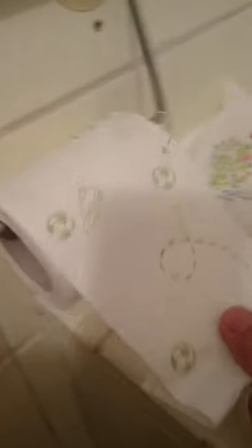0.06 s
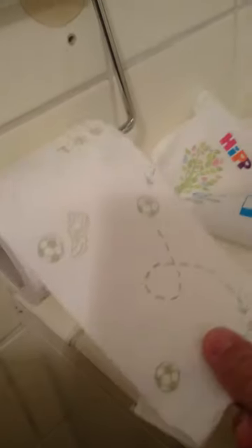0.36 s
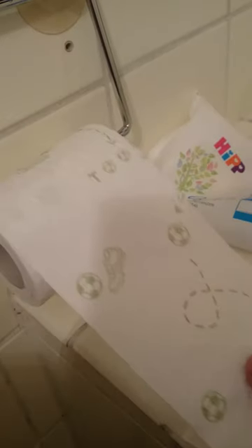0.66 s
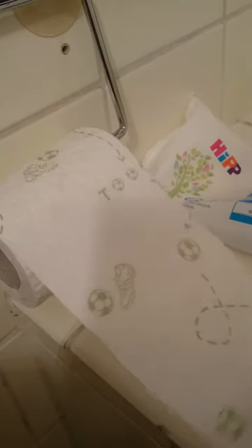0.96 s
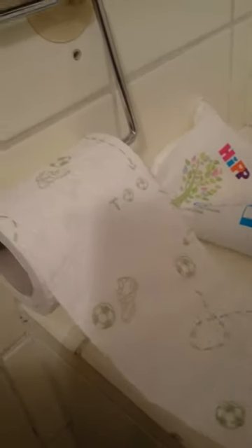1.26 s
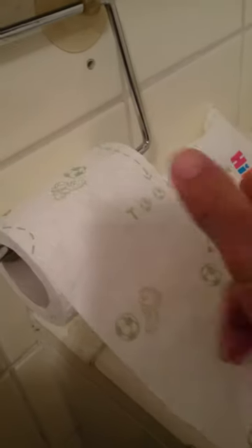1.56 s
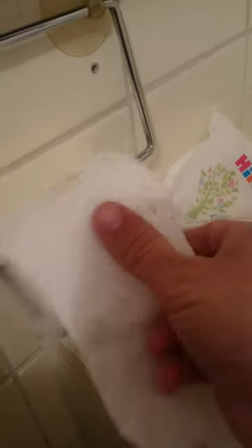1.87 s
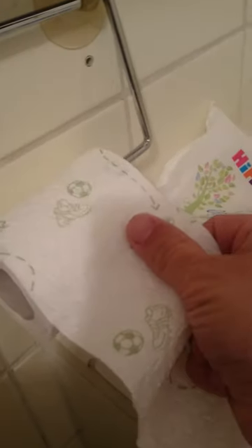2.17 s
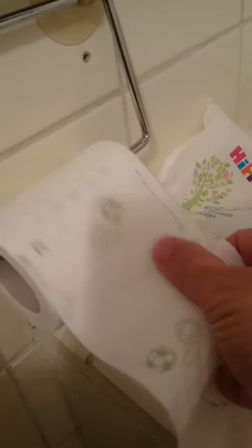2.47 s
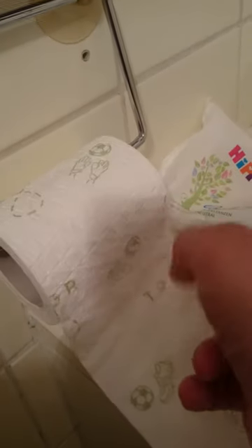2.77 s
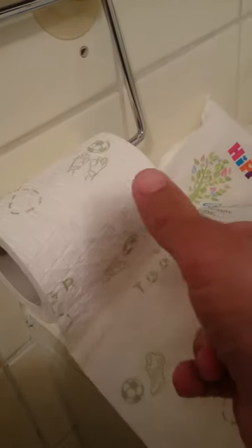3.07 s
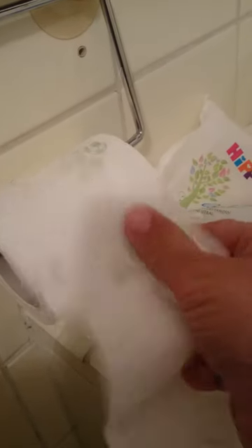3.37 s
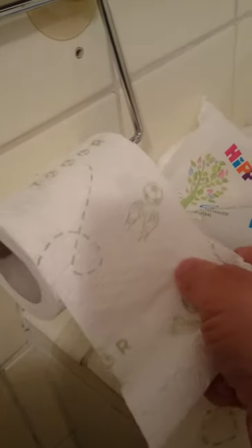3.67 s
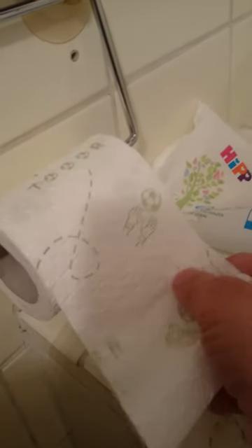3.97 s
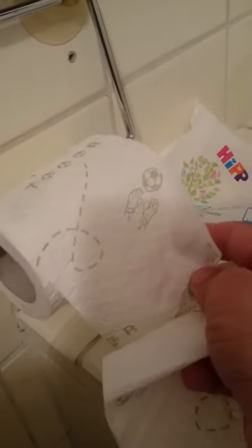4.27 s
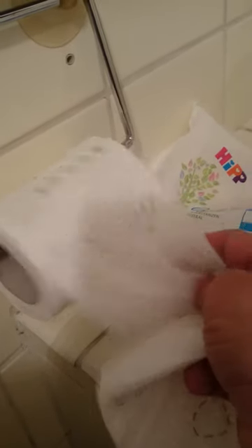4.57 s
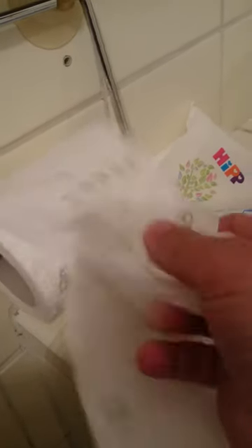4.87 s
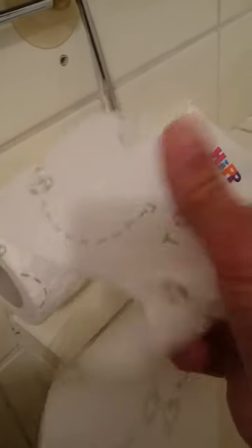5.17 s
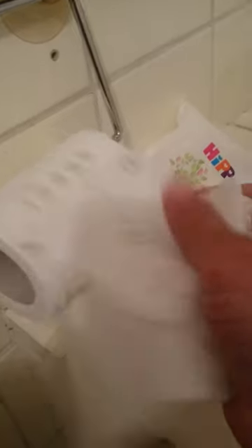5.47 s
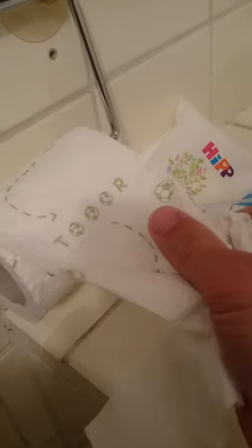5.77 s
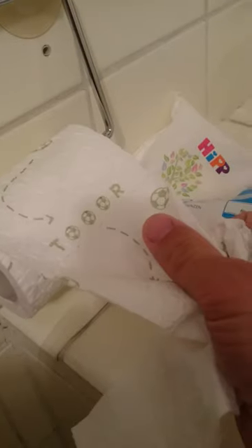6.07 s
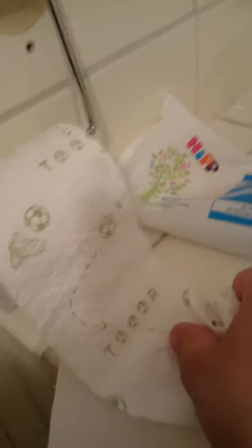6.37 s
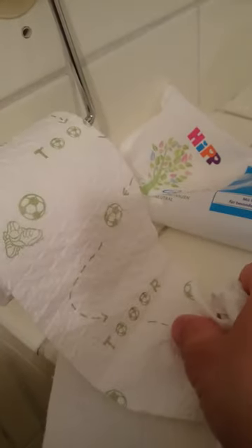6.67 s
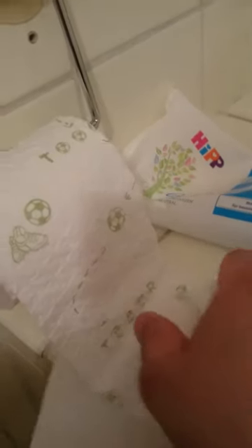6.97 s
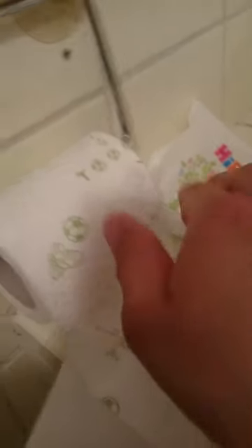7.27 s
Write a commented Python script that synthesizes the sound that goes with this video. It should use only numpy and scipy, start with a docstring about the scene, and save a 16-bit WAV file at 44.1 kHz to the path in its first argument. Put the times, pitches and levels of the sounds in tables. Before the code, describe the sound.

Close up in a small tiled bathroom, dull handling bumps and a low rumble sound on the right while toilet paper stirs faintly on the left. The paper is then tugged from its roll in brief, dry swishes with little crinkles, growing into a louder, uneven run of unrolling. It eases off into a few gentle pulls and last soft bumps, with a light room echo and faint hiss underneath.

```python
"""Toilet paper is pulled off a wall roll and gathered in one hand, close to a phone in a tiled bathroom.
It opens on a faint rustle in the open left microphone port, which rings near 5 kHz, and on soft thumps
and grip tremor on the right, where a finger covers the port and hardly any paper is heard.
At 1.6 s the finger presses hard and the skin ticks. Short hissing, crinkling tugs follow and build to
a long unrolling from 4.6 to 5.7 s; a few light pulls and last thumps close the scene."""
import sys
import numpy as np
from scipy import signal
from scipy.fft import rfft, irfft, next_fast_len
from scipy.io import wavfile

SR = 44100
rng = np.random.default_rng(int(sys.argv[2]) if len(sys.argv) > 2 else 0)


def master(y):
    """Save y as 16-bit WAV."""
    cut = np.clip(np.atleast_2d(y).T, -1, 1)
    pcm = np.round(cut * 32767)  # scale
    wavfile.write(sys.argv[1], SR, pcm.astype(np.int16))


N = 323469

# Shifts of the finger on the covered port. Each row: time in seconds, relative pressure step in dB,
# half rise time in milliseconds, direction (+1 press, -1 release).
FINGER_SHIFTS = [(0.0138, -20, 0.32, -1), (0.0267, -3.5, 3.5, -1), (0.071, -22.5, 1.34, -1),
                 (0.6125, -21, 1.33, 1), (0.8413, -21, 2.56, 1), (1.328, -31.5, 1.07, -1),
                 (1.6027, -3.3, 1.03, 1), (1.6079, -1.5, 2.6, -1), (1.653, -9.5, 4, 1),
                 (1.999, -11, 4.9, 1), (2.6923, -23.5, 1.7, -1), (2.747, -11, 4.2, 1),
                 (2.8134, -12, 0.47, -1), (3.9614, -15.5, 0.43, -1), (3.994, -10, 2.8, 1),
                 (4.146, -25, 0.9, 1), (4.1548, -13.5, 2.1, -1), (4.2044, -18, 1.58, 1),
                 (5.077, -13, 0.23, -1), (5.5498, -10.5, 0.2, -1), (6.0309, -19, 0.77, -1),
                 (6.309, -12.5, 3.8, 1), (6.36, -21.5, 0.98, -1), (6.696, -26, 2, -1)]


def paper():
    """Sliding plies: the fibres hiss, the sheet radiates their slips lower down, the loose end flutters."""
    # The tone of the three layers. Each row: frequency in Hz, relative level in dB.
    fibre_spectrum = [(1500, -27), (3000, -11), (4200, -2), (5500, -3), (7500, -9.5), (10000, -9),
                      (13000, -9), (16000, -7.5)]
    sheet_spectrum = [(900, -19), (1400, -11), (2000, -1.5), (2800, -2.5), (4000, -4.5), (7000, -19)]
    flutter_spectrum = [(40, -3), (90, -2), (180, 3), (280, -5), (450, -1.5), (700, 1.5), (1100, -0.5),
                        (1800, -9), (4000, -36)]
    swish_db, sheet_db, flutter_db = tug_levels()
    patches = undb(1.52 * walk(45) + 0.69 * walk(260))  # the embossing catches in patches
    rate = 9000 * undb(.3 * (swish_db + 45.5))  # faster sliding breaks more contacts a second
    fibres = unit(port(colour(slips(rate, spread_db=0) * patches, fibre_spectrum)))
    brightness = undb(np.clip(0.1 * (swish_db + 37.5), -7, 2))  # a harder pull is brighter
    fibres = cut(fibres, 2, 8500, "low") - cut(fibres, 2, 8500, "high") * brightness
    sheet = unit(colour(slips(rate, spread_db=1.5) * patches, sheet_spectrum)) * undb(sheet_db + 1.5)
    flutter = unit(colour(slips(rate, spread_db=2) * patches, flutter_spectrum))
    flutter *= undb(flutter_db + 2.17)
    return undb(swish_db - 0.47) * (fibres + sheet + flutter)


def tug_levels():
    """Tugs speed up, hold, run out and settle: the swish in dB, then sheet and flutter relative to it."""
    # Each row: time at full speed in seconds, length in seconds, swish level in dB, swell over the
    # length in dB, body of the sheet and flutter of the loose end, both in dB relative to the swish.
    tugs = [(0.0, .035, -61.5, -3, -10, -16), (0.07, 0.63, -72, -5, -8, -16),
            (0.963, .07, -69, -3, -1, -32), (1.806, 0.046, -58.5, -3.5, -6.5, -15),
            (1.867, 0.1, -48.5, 2.5, -11, -13), (2.505, 0.07, -55.5, 0.5, -8.5, -17),
            (2.603, 0.064, -49, 4, -4.5, -21), (3.299, 0.013, -54, 0.5, -5, -9),
            (3.36, 0.026, -46, -0.5, -7.5, -12.5), (3.413, .08, -56.5, 1.5, -8, -10),
            (3.51, 0.097, -52, -1, -7, -17), (3.988, 0.044, -54, 5, -10, -18),
            (4.048, 0.084, -51.5, 0, -9, -18), (4.166, 0.11, -56.5, -6, -9.5, -15.5),
            (4.581, 0.088, -45, -1, -9, -18.5), (4.672, 0.016, -41, 0.5, -7.5, -20.5),
            (4.711, 0.094, -49.5, -3, -8.5, -13), (4.835, 0.18, -41.5, -0.5, -9.5, -17.5),
            (5.013, 0.052, -38, -0.5, -6, -16.5), (5.082, 0.14, -46, -1, -6, -20),
            (5.226, 0.031, -37.5, 2, -8.5, -19.5), (5.287, 0.083, -41, -7.5, -10.5, -13),
            (5.388, 0.085, -36.5, 5, -8.5, -17), (5.52, 0.099, -44, -1, -8.5, -15.5),
            (6.188, .012, -49, 0, -8.5, -22), (6.235, 0.057, -53.5, 1.5, -10.5, -13),
            (6.318, 0.027, -56, 0, -4.5, -13.5), (6.774, .08, -53, 3.5, -6, -31),
            (6.89, 0.31, -57.5, -8.5, -10, -23)]
    creep_db, creep_s = -10, .035  # the slack sheet creeps before a tug takes hold
    attack_s, release_s = 0.021, 0.035
    settle_db, settle_s = -22.5, 0.16  # the loose sheets rustle on afterwards
    resting_db = [-76.5, -81.5, -84]  # the paper stirs in the resting hand: swish, sheet, flutter
    t = np.arange(N) / SR
    power = undb(resting_db)[:, None] ** 2 * np.ones(N)
    for start, length, db, swell_db, sheet_db, flutter_db in tugs:
        before, after = np.maximum(start - t, 0), np.maximum(t - start - length, 0)
        attack = np.maximum(np.exp(-before / attack_s), undb(creep_db) * np.exp(-before / creep_s))
        hold = undb(db + swell_db * (np.clip((t - start) / length, 0, 1) - .5))
        release = np.maximum(np.exp(-after / release_s), undb(settle_db) * np.exp(-after / settle_s))
        power += np.outer(undb([0, sheet_db, flutter_db]), attack * hold * release) ** 2
    swish, sheet, flutter = 10 * np.log10(power)
    return swish, sheet - swish, flutter - swish


def slips(rate, spread_db):
    """Fibres catch and let go: dense tiny clicks of uneven size, equally strong overall at any rate."""
    size = undb(spread_db * np.minimum(rng.exponential(size=N), 5))
    clicks = (rng.random(N) < rate / SR) * size * rng.standard_normal(N)
    return clicks / np.sqrt(np.minimum(rate, SR))


def creases(decay_s, gain_db):
    """Creases buckle, each in a burst of a few milliseconds."""
    # Each row: time in seconds, relative peak level in dB.
    snaps = [(1.8617, -44), (1.9257, -36), (2.666, -46), (3.3604, -38), (3.3672, -33.5), (5.2444, -33),
             (5.6094, -44.5), (5.6186, -43), (6.1898, -39.5)]
    spectrum = [(200, -2), (700, 0), (2500, -0.5), (5000, 0.5), (8000, -11.5), (16000, -24)]
    t = np.arange(N // 200) / SR
    bursts = np.zeros(N + len(t))
    for start, db in snaps:
        i = int(start * SR)
        bursts[i:i + len(t)] += undb(db + gain_db) * rng.standard_normal(len(t)) * np.exp(-t / decay_s)
    return port(colour(bursts[:N], spectrum))


def port(x):
    """The small cavity in front of the open microphone rings."""
    # Each row: frequency in Hz, width in Hz, gain in dB.
    resonances = [(5285, 890, 13.5), (15300, 2000, 7)]
    return x + sum(undb(db) * resonate(x, hz, width) for hz, width, db in resonances)


def finger_thumps(low_cut_hz, gain_db):
    """Each shift steps the trapped air's pressure; the microphone's low cut rings it into a thump."""
    t = np.arange(N) / SR
    pressure = sum(direction * undb(db + gain_db) * np.tanh((t - at) / (half_rise_ms / 1000)) / 2
                   for at, db, half_rise_ms, direction in FINGER_SHIFTS)
    return cut(pressure - pressure[0], 6, low_cut_hz, "high")


def grip_tremor(gain_db):
    """The holding hand trembles: a slowly growing rumble, stronger for a moment after each shift."""
    # Each row: frequency in Hz, relative level in dB.
    tremor_spectrum = [(20, -19), (35, -16.5), (50, 1.5), (70, 0), (95, -8), (130, -18.5), (200, -29),
                       (300, -35.5), (500, -43), (1200, -58)]
    growth_db_per_s, calming_s = 0.72, 0.38
    t = np.arange(N) / SR
    resting = undb(-54.5 + growth_db_per_s * t)
    unrest_power = sum((undb(-43 + 0.94 * db) * (t > at) * np.exp(-np.abs(t - at) / calming_s)) ** 2
                       for at, db, _, _ in FINGER_SHIFTS)
    return noise(tremor_spectrum) * np.sqrt(resting ** 2 + unrest_power) * undb(gain_db)


def skin_tick(at_s, gain_db, decay_s):
    """With the firmest press the skin ticks against the rim of the port."""
    age = np.arange(N) / SR - at_s
    tick = (age >= 0) * np.exp(-np.abs(age) / decay_s)
    ring = tick + 4.0 * resonate(tick, 9000, 1300) + 0.58 * resonate(tick, 3600, 300)
    return undb(gain_db) * cut(ring, 4, 11000, "low")


def faint_right_treble(x):
    """A faint, diffuse high sizzle follows the rustling, held back during the long unrolling."""
    # Each row: time in seconds, relative level in dB.
    treble_levels = [(4.25, 0), (4.6, -6), (5.0, -10), (5.7, -11), (6.1, 3)]
    spectrum = [(300, 2), (1500, -9), (3000, -9), (5300, -19), (8500, 16), (12000, 20), (15500, 5)]
    diffuse = reverb(x, t60_s=0.048, treble_t60_s=0.024, wet_db=-17)
    return fader(treble_levels) * colour(diffuse, spectrum)


def reverb(x, t60_s, treble_t60_s, wet_db):
    """A diffuse tail keeps the sound for a moment; the top dies first."""
    t = np.arange(SR) / SR
    low = cut(rng.standard_normal(SR), 4, 7000, "low") * undb(-60 * t / t60_s)
    high = cut(rng.standard_normal(SR), 4, 7000, "high") * undb(-60 * t / treble_t60_s)
    tail = (low + 0.68 * high) * (t > .004)
    return undb(wet_db) * signal.fftconvolve(x, tail / np.sqrt(np.sum(tail ** 2)))[:N]


def background_hiss(gain_db):
    """A soft bed of hiss drifts up and down in level."""
    # Each row: time in seconds, relative level in dB.
    hiss_levels = [(0, -66.5), (1.5, -71.5), (2.75, -66), (3.2, -70.5), (3.5, -67.5), (4.4, -67.5),
                   (5.35, -63.5), (6.7, -69), (7.3, -67)]
    # Each row: frequency in Hz, relative level in dB.
    hiss_spectrum = [(100, 8.5), (500, -4), (1100, -3), (2000, 0), (3200, 0.5), (5500, -1.5), (8000, -3.5),
                     (11000, -9.5), (16000, -12)]
    return noise(hiss_spectrum) * fader(hiss_levels) * undb(gain_db)


def room_tone():
    """A faint low rumble wavers under everything."""
    # Each row: frequency in Hz, relative level in dB.
    rumble_spectrum = [(20, 1.5), (80, 2.5), (150, -2), (250, -8), (400, -11), (700, -21), (1500, -43)]
    return noise(rumble_spectrum) * undb(-66.5 + 1.9 * walk(4))


def undb(db):
    """Decibels to gain."""
    return 10 ** (np.asarray(db) / 20)


def fader(points):
    """A gain that rides through (seconds, dB) points."""
    times, db = np.transpose(points)
    return undb(np.interp(np.arange(N) / SR, times, db))


def unit(x):
    """Scale to rms 1."""
    return x / np.sqrt(np.mean(x ** 2))


def colour(x, points):
    """Equalise a sound with a curve through (Hz, dB) points."""
    hz, db = np.transpose(points)
    size = 2 * next_fast_len(N)
    freqs = np.maximum(np.fft.rfftfreq(size, 1 / SR), 1)
    gain = undb(np.interp(np.log(freqs), np.log(hz), db))
    return irfft(rfft(x, size) * gain)[:N]


def noise(points):
    """Coloured noise of rms 1."""
    return unit(colour(rng.standard_normal(N), points))


def walk(rate):
    """Random levels joined by lines, rate of them a second."""
    return 0.94 * np.interp(np.arange(N) / SR * rate, np.arange(8000), rng.standard_normal(8000))


def resonate(x, hz, width_hz):
    """One resonance with gain 1 at its centre."""
    return signal.lfilter(*signal.iirpeak(hz, hz / width_hz, fs=SR), x)


def cut(x, order, hz, passes):
    """A filter that passes the "low" or the "high" side of hz."""
    return signal.sosfilt(signal.butter(order, hz, passes, fs=SR, output="sos"), x)


def scene():
    """Left: the open port with paper and tiled room. Right: the finger's sounds and a faint sizzle."""
    near = paper() + creases(decay_s=0.0017, gain_db=0.5)
    paper_in_room = near + reverb(near, t60_s=0.72, treble_t60_s=0.39, wet_db=-13.5)
    left = paper_in_room + background_hiss(gain_db=1.26) + room_tone()
    right = faint_right_treble(paper_in_room) + finger_thumps(low_cut_hz=53.9, gain_db=1)
    right += grip_tremor(gain_db=2.5) + skin_tick(at_s=1.6027, gain_db=-22.5, decay_s=0.00063)
    right += background_hiss(gain_db=2.5)
    return np.array([left, right])


def record(dry):
    """The phone cuts the top steeply."""
    top_hz = 15850
    return signal.sosfilt(signal.ellip(10, .2, 70, top_hz, fs=SR, output="sos"), dry)


dry = scene()
out = record(dry)
master(out)
```